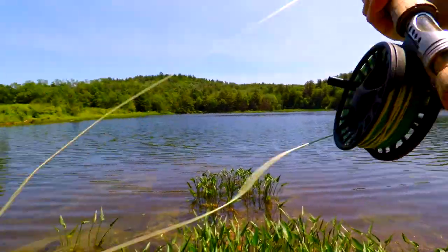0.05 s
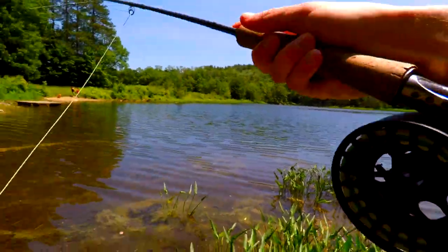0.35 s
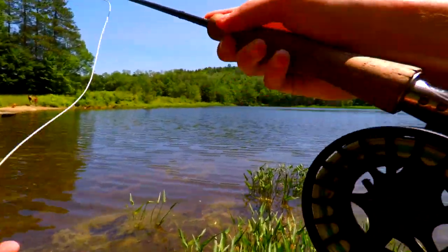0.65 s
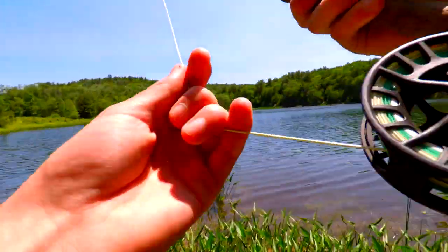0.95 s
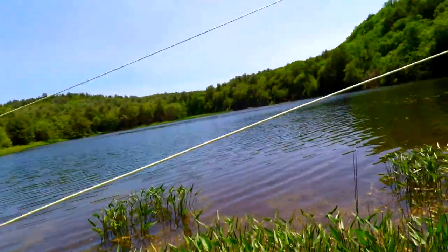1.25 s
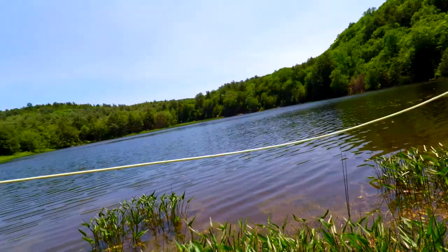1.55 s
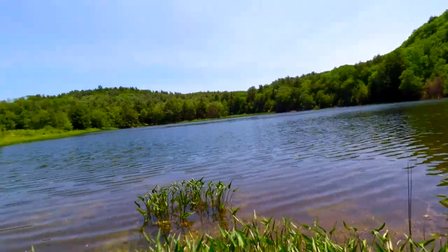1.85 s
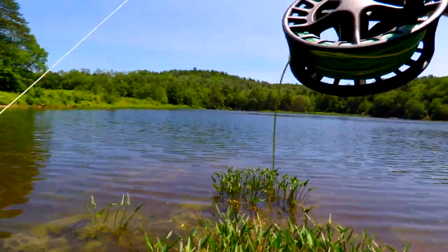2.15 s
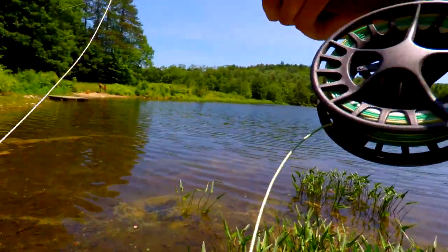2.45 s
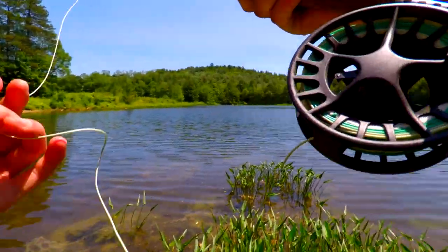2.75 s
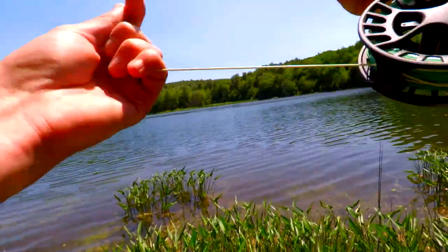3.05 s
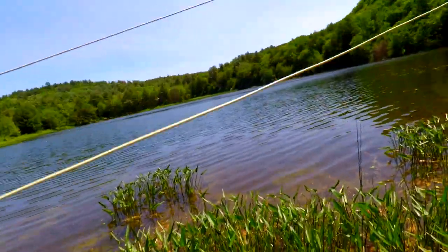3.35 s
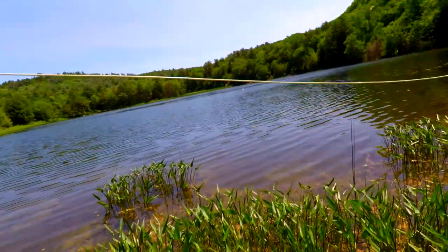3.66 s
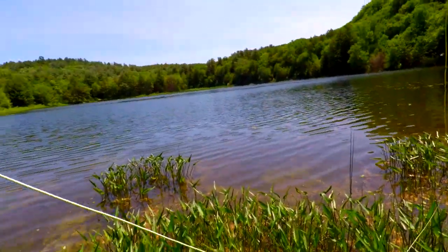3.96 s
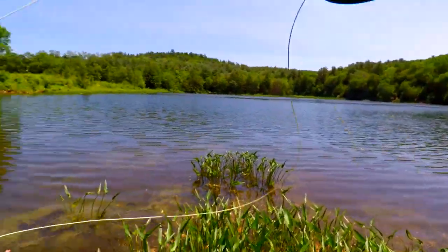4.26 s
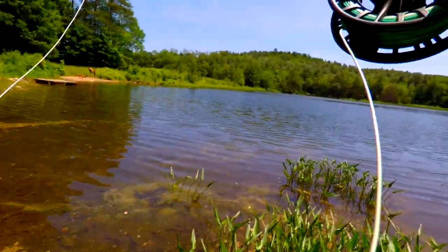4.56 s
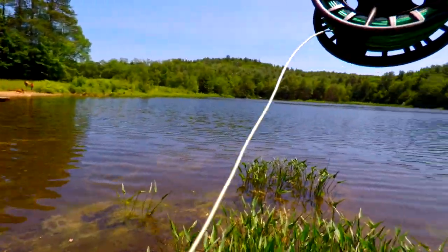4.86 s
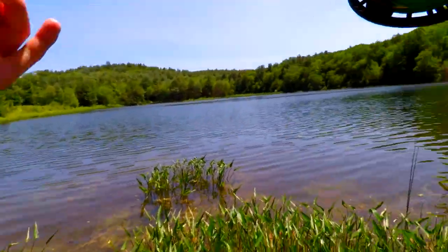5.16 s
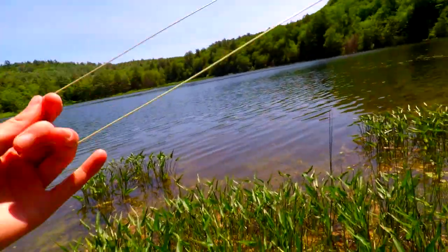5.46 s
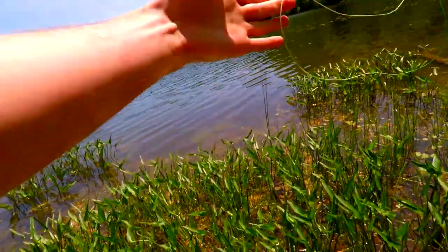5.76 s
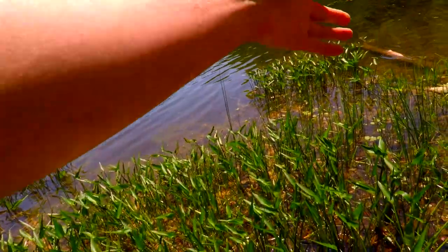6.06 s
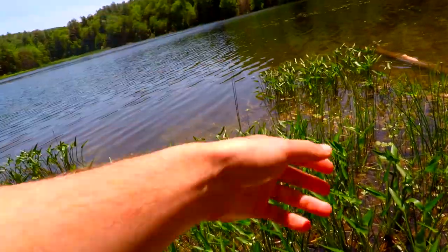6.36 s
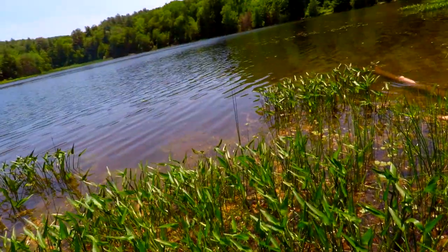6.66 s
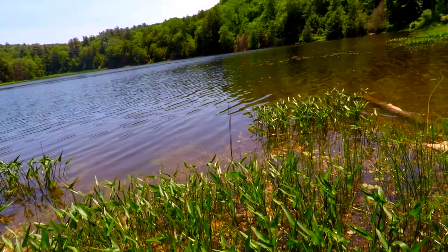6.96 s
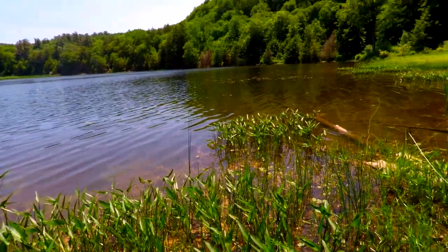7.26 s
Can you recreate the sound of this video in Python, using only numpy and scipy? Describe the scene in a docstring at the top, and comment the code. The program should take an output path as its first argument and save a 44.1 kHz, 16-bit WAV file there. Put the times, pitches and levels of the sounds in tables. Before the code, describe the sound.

A short run of sharp reel clicks opens a spell of fly casting, heard close on a body-worn microphone. Two faster ratcheting zips follow a couple of seconds apart, then a last, slower one. In between come a soft, grainy hiss of sliding line, small dry snaps and dull thumps as each stroke turns. A faint lakeside breeze and an even rustle of leaves continue behind it all.

```python
"""A quiet lake shore, fly casting heard close up on the microphone of a body-worn camera.
Four pulls strip line off the reel, whose pawl clicks speed up into a zip and slow down again.
Between pulls the line hisses through the rod guides and ticks against rod and fingers. Each turn of
the casting stroke jolts the microphone with a low thump. Behind it all, a light breeze and leaves."""
import sys
import numpy as np
from scipy import signal
from scipy.fft import rfft, irfft
from scipy.io import wavfile
from scipy.ndimage import map_coordinates

SR = 44100
rng = np.random.default_rng(int(sys.argv[2]) if len(sys.argv) > 2 else 0)


def to_wav(sig):
    """Store sig (one row per channel, or 1-D mono) as 16-bit WAV at the path in sys.argv[1].

    Samples outside -1..1 are clipped; the rate is SR.
    """
    pcm = np.clip(np.atleast_2d(sig), -1, 1) * 32767
    pcm = np.round(pcm).astype(np.int16)
    wavfile.write(sys.argv[1], SR, pcm.T)  # frames by channels


N = 321792

# runs of line through the guides: start/s, end/s, final relative level/dB, state of the line
LINE_RUNS = [(0.43, 0.734, -71, "light"), (2.204, 2.852, -73.5, "taut"), (4.398, 5.14, -73.5, "taut"),
             (5.276, 5.428, -71, "taut"), (5.668, 5.849, -77, "slack")]


def reel_pawl(tail_db=-8, tail_t60=0.058, scatter_db=1.83, jitter_s=6e-6, size=2048):
    """The pawl drops off tooth after tooth; each rings the same reel, so a fast spin has a pitch."""
    # spool speed, one list for each pull: t/s, rate/(teeth/s)
    pulls = [
        [(.1136, 72), (.138, 132), (.16, 155), (.19, 178), (.207, 175), (.234, 119), (.2607, 64)],
        [(.9666, 25), (.994, 88), (1.03, 225), (1.07, 345), (1.11, 520), (1.15, 775), (1.167, 850),
         (1.185, 878), (1.21, 832), (1.29, 385), (1.325, 175), (1.3522, 58)],
        [(3.0653, 135), (3.125, 340), (3.145, 430), (3.183, 690), (3.205, 785), (3.225, 905), (3.24, 934),
         (3.255, 930), (3.285, 785), (3.315, 580), (3.365, 300), (3.414, 68)],
        [(5.2936, 92), (5.315, 205), (5.36, 285), (5.385, 295), (5.432, 205), (5.4626, 82)],
    ]
    # the reel's answer along the pulls: t/s, spool resonance/Hz, body level/dB, treble level/dB
    reel_response = [(.11, 4350, -34.5, -33), (.16, 4550, -38, -31.5), (.19, 4450, -40.5, -34),
                     (.215, 4460, -36, -31.5), (.26, 4230, -32.5, -33.5), (.97, 4300, -39, -37),
                     (1.04, 4360, -37.5, -35.5), (1.08, 4400, -38, -38), (1.115, 4830, -36.5, -40),
                     (1.15, 4830, -36.5, -36.5), (1.185, 5140, -39.5, -39), (1.21, 5040, -39, -38),
                     (1.265, 5650, -40.5, -41), (1.3, 4160, -43, -40), (1.35, 4200, -39, -44),
                     (3.07, 4500, -35.5, -37.5), (3.12, 4900, -35, -37), (3.15, 3860, -39, -37.5),
                     (3.2, 4170, -37, -37), (3.245, 3800, -36, -42), (3.28, 3900, -42.5, -40.5),
                     (3.315, 4850, -40.5, -42), (3.342, 4600, -48, -41.5), (3.364, 4600, -40.5, -38.5),
                     (3.41, 4470, -47, -44), (5.29, 4700, -39, -40), (5.31, 4730, -45, -37),
                     (5.34, 4750, -42.5, -40), (5.372, 4570, -44, -41), (5.4, 4750, -40, -37.5),
                     (5.44, 4800, -45, -42), (5.46, 4380, -42, -43)]
    out, t, hz = np.zeros(N), np.arange(size) / SR, np.fft.rfftfreq(size, 1 / SR)
    scrape_decay = (1 - np.exp(-t / .0005)) * amp(-60 * t / .0045)
    treble = np.interp(hz, [8000, 10000], [0, 1])
    response_s, *columns = np.transpose(reel_response)
    for pull in pulls:
        knots, rates = np.transpose(pull)
        clock = np.arange(knots[0], knots[-1], 1 / SR)
        teeth = np.cumsum(np.interp(clock, knots, rates)) / SR
        times = np.interp(np.linspace(0, teeth[-1], round(teeth[-1]) + 1), teeth, clock)
        ring_hz, body_db, treble_db = (np.interp(times, response_s, c)[:, None] for c in columns)
        tooth_rate = np.interp(times, knots, rates)
        spin = np.interp(tooth_rate, [340, 560], [0, 1])[:, None]  # 0 slow clicks, 1 fast zip
        # the teeth of a pull share one snap and one tail of fine resonances; each adds its own scrape
        snap = pawl_snap(hz)
        tail = amp(tail_db) * unit_power(rfft(rng.standard_normal(size) * amp(-60 * t / tail_t60)))
        scrape = unit_power(rfft(rng.standard_normal((len(times), size)) * scrape_decay))
        roughness = .6 * (1 - spin) + .38 * spin
        contact = snap + tail * (1 + spin) / 2 + scrape * roughness
        struck = contact * reel_ring(times, hz, ring_hz, spin)
        clicks = amp(body_db) * unit_power(struck * (1 - treble))
        clicks += amp(treble_db) * unit_power(struck * treble)
        times = times + jitter_s * rng.standard_normal(len(times))
        subsample_delay = np.exp(-2j * np.pi * hz / SR * (times * SR % 1)[:, None])
        for s, click in zip(times, irfft(clicks * subsample_delay)):
            add(out, s, amp(scatter_db * rng.standard_normal()) * click)
    return out


def pawl_snap(hz, spread_s=0.0014, bands=36):
    """Flat spectrum of a snap whose bands each arrive a little late, by up to spread_s."""
    delay = spread_s * np.interp(hz, np.linspace(0, SR / 2, bands), rng.uniform(.1, 1, bands))
    return np.exp(-2j * np.pi * np.cumsum(delay) * hz[1])


def reel_ring(times, hz, ring_hz, spin, half_width_hz=510, patch_s=.022, patch_hz=800):
    """The reel's response to each tooth; at speed the pawl skims and the ring spreads out."""
    # the reel's spectrum under single clicks and in a fast spin: f/Hz, level/dB
    slow_spectrum = [(400, -30.5), (1500, -11), (2150, -5.5), (2600, -11.5), (3100, -7), (3550, -11.5),
                     (4400, -13.5), (5400, -12.5), (6000, -8.5), (7700, -10), (8600, -13), (9600, -11.5),
                     (10300, -1), (10900, -16), (11500, 4), (12200, -17.5), (12800, 7.5), (13300, 0.5),
                     (15000, -1), (16000, -16)]
    fast_spectrum = [(400, -32), (950, -10), (1800, -6.5), (2450, -8.5), (3000, -1.5), (3550, 3),
                     (4250, -3), (4900, 2), (5500, 0.5), (6000, 1), (6500, 1), (7800, -8), (9300, -12),
                     (10400, 2.5), (11500, -1), (13900, 4.5), (14600, 0), (15200, -15), (16000, -41)]
    resonance = 1 / (1 + ((hz - ring_hz) / half_width_hz) ** 6)
    slow_db = spectrum_db(slow_spectrum, hz) + 14 * resonance
    fast_db = spectrum_db(fast_spectrum, hz) + 3.5 * resonance
    # as the spool turns, its ring shifts in random patches of time and frequency
    rows, columns = (times - times[0]) / patch_s, hz / patch_hz
    field = rng.standard_normal((int(rows[-1]) + 2, int(columns[-1]) + 2))
    patches = map_coordinates(field, np.meshgrid(rows, columns, indexing="ij"))
    patch_db = 3.2 * patches * (1 + spin) / 2
    return minimum_phase((1 - spin) * slow_db + spin * fast_db + patch_db)


def line_hiss(gain_db=4, attack_s=0.074, release_s=0.031, rise_db=2, flutter_db=1.5, grain_db=2.2):
    """The line's coating rubs over the guides: a grainy hiss that grows until the run is checked."""
    # hiss of lightly cast, taut and slack line: f/Hz, level/dB
    light_spectrum = [(500, -10), (2000, -9), (3500, -7.5), (5800, -6.5), (6700, 0), (7200, -4.5),
                      (7800, -0.5), (9000, -19), (10000, -13), (11500, -21), (14000, -15), (15500, -43)]
    taut_spectrum = [(500, -4), (2300, -3), (2950, -7.5), (3450, 0.5), (3950, -4), (4650, 1.5),
                     (5400, -4.5), (6100, -6), (6900, -7.5), (7900, -5.5), (9000, -15), (12500, -21),
                     (14000, -20), (15000, -20), (15500, -30)]
    slack_spectrum = [(600, 3.5), (1700, 6.5), (3500, 3), (7500, 0.5), (9500, -8), (14000, -1),
                      (15500, -20)]
    # brushes over the fingers: t/s, half length/s, relative level/dB, state of the line
    brushes = [(0.504, 0.031, -79, "slack"), (0.822, 0.021, -76, "light"), (1.127, 0.13, -74.5, "slack"),
               (2.872, 0.02, -63.5, "taut"), (3.228, .08, -71.5, "slack"), (3.115, 0.012, -62.5, "taut"),
               (5.333, 0.014, -67, "taut"), (6.027, 0.02, -71, "slack")]
    out, t = np.zeros(N), np.arange(N) / SR
    spectra = {"light": light_spectrum, "taut": taut_spectrum, "slack": slack_spectrum}
    level = {state: np.zeros(N) for state in spectra}
    for start, end, db, state in LINE_RUNS:
        edges = np.exp(np.minimum(t - start, 0) / attack_s - np.maximum(t - end, 0) / release_s)
        level[state] += edges * amp(db + np.interp(t, [start, end], [-rise_db, 0]))
    for s, half_length, db, state in brushes:
        level[state] += amp(db) * swell(s, half_length)
    for state, spectrum in spectra.items():
        hiss = noise(spectrum) * amp(flutter_db * wobble(40) + grain_db * wobble(900))
        out += level[state] * unit_rms(hiss)
    return amp(gain_db) * out


def line_singing():
    """Late in a run the fast line sings in the guides with a narrow, high hiss."""
    # swells of the singing: t/s, half length/s, level/dB
    swells = [(2.76, 0.16, -75), (4.98, 0.16, -81)]
    # its band near 8 kHz: f/Hz, level/dB
    spectrum = [(5000, -56), (7100, -21), (7700, 0), (8200, 1), (8800, -22), (12500, -20), (14200, -12),
                (15500, -36)]
    return sum(amp(db) * swell(s, half_length) for s, half_length, db in swells) * noise(spectrum)


def line_ticks(gain_db=-6, t60=.013, strays_per_run=3, size=2048):
    """The line touches rod, reel and fingers, each time with a short, dry snap."""
    # touches: t/s, relative level/dB, centre/Hz, fall one octave off the centre/dB
    touches = [(.073, -55, 7000, 7), (.1394, -53, 3970, 0.5), (.681, -47.5, 3500, 5.5),
               (.688, -46.5, 3480, 7.5), (.711, -58, 4970, 2), (.72, -46, 4000, 5), (.728, -48.5, 5000, 9),
               (.766, -44.5, 9000, 0), (.771, -46.5, 2000, 3), (.776, -60, 3000, 6), (.785, -55, 4000, 10),
               (.817, -55, 4470, 11), (.827, -53, 5000, 15), (.834, -63, 5500, 10), (.852, -57, 5070, 14),
               (.952, -51, 5500, 3), (1.104, -38, 8000, 8), (2.395, -46.5, 1470, 4.5),
               (2.8537, -30, 9830, 1.5), (2.873, -50, 7000, 0), (3.2237, -33, 4200, -0.5),
               (3.476, -52.5, 1790, 8), (3.996, -51.5, 2470, 8), (4.458, -50, 2950, 12),
               (5.117, -42.5, 7840, 5), (5.185, -42.5, 10000, -1), (5.3177, -38, 5400, 14),
               (5.33, -49, 5300, 5), (6.09, -51, 4000, 6)]
    strays = [(rng.uniform(start, end), -58 - 3 * rng.standard_normal(), 10000, 5)
              for start, end, *_ in LINE_RUNS for touch in range(strays_per_run)]
    out, t, hz = np.zeros(N), np.arange(size) / SR, np.fft.rfftfreq(size, 1 / SR)
    decay = (1 - np.exp(-t / .0003)) * amp(-60 * t / t60)
    for s, db, centre_hz, skirt_db in touches + strays:
        hump_db = -skirt_db * np.log2((hz + 100) / centre_hz) ** 2
        snap = rfft(rng.standard_normal(size) * decay)
        add(out, s, amp(db + gain_db) * irfft(snap * minimum_phase(hump_db)))
    return out


def frame_pings(t60=.06):
    """Light knocks ring the reel's metal frame briefly on one mode."""
    # knocks: t/s, level/dB, f/Hz
    knocks = [(.016, -65, 4980), (.036, -61, 4980), (2.875, -57, 4980), (2.893, -61, 4980),
              (5.318, -51, 5750)]
    out, t = np.zeros(N), np.arange(SR // 8) / SR
    decay = (1 - np.exp(-t / .001)) * amp(-60 * t / t60)
    for s, db, hz in knocks:
        add(out, s, amp(db) * decay * np.sin(2 * np.pi * hz * t))
    return out


def microphone_thumps(leak_s=0.074):
    """A jolt is a soft pressure step that leaks away; the body's sway adds a drift below hearing."""
    # jolts at the turns of the stroke: t/s, signed strength, rise/s, cushioning low-pass/Hz
    jolts = [(1.006, 0.18, 0.014, 45), (1.19, -0.23, 0.018, 44.8), (1.705, 0.22, 0.014, 45),
             (2.033, -0.82, 0.18, 40), (2.89, 0.13, 0.019, 70), (3.156, -0.25, 0.014, 71),
             (3.715, 0.33, 0.035, 30), (4.151, -0.58, 0.15, 60), (5.212, 0.18, 0.014, 69),
             (5.382, -0.23, 0.014, 64.5), (5.676, 0.19, 0.063, 30), (6.692, 0.44, 0.17, 30)]
    # drift as the body moves: t/s, level/dB
    sway = [(0, -30), (5.6, -35), (6.0, -44), (7.3, -38.5)]
    out, t = np.zeros(N), np.arange(SR) / SR
    for s, strength, rise_s, cushion_hz in jolts:
        jolt = np.zeros(N)
        add(jolt, s, strength * (1 - np.exp(-t / rise_s)) * np.exp(-t / leak_s))
        out += signal.sosfiltfilt(signal.butter(1, cushion_hz, fs=SR, output="sos"), jolt)
    sway_db = np.interp(np.arange(N) / SR, *np.transpose(sway))
    return out + amp(sway_db) * wobble(6)


def thin_tone(pitch_hz=935, waver_hz=10):
    """A faint, wavering tone sounds twice during the second cast."""
    # swells of the tone: t/s, half length/s, level/dB
    swells = [(2.195, 0.033, -68.5), (2.356, 0.011, -68)]
    level = sum(amp(db) * swell(s, half_length) for s, half_length, db in swells)
    hz = pitch_hz + waver_hz * wobble(31.1)
    return level * np.sin(2 * np.pi * np.cumsum(hz) / SR)


def shore_breeze(rush_db=-62.5, air_db=-71, leaves_db=-76):
    """A light breeze over the lake, with one soft gust, and a faint, even rustle of leaves."""
    # low rush of wind, open air and leaves: f/Hz, level/dB
    rush_spectrum = [(20, 16), (50, 9.5), (90, 4), (160, -2), (300, -3), (450, -8), (800, -14), (2000, -44)]
    air_spectrum = [(100, -14.5), (300, -2.5), (520, -1), (900, -3.5), (1400, -5), (2200, -12),
                    (3500, -17.5), (6000, -22.5), (12000, -36)]
    leaf_spectrum = [(1000, 5.5), (2500, 3), (4500, -1.5), (7000, -4), (12000, -5.5), (15000, -16)]
    gust_db = 4 * swell(s=4.53, half_length=0.56)
    rush = amp(rush_db + gust_db + .5 * wobble(6)) * noise(rush_spectrum)
    air = amp(air_db + 0.48 * gust_db + .5 * wobble(6)) * noise(air_spectrum)
    leaves = amp(leaves_db + .5 * wobble(6)) * noise(leaf_spectrum)
    return rush + air + leaves


def amp(db):
    return 10 ** (np.asarray(db) / 20)


def unit_rms(x):
    return x / np.sqrt(np.mean(x ** 2) + 1e-20)


def unit_power(gain):
    """Each row of gains brought to a mean power of 1."""
    return gain / np.sqrt(np.mean(abs(gain) ** 2, -1, keepdims=True))


def spectrum_db(points, hz):
    """Join (f/Hz, level/dB) points on a log frequency axis."""
    f, db = np.transpose(points)
    return np.interp(np.log(hz + 1), np.log(f + 1), db)


def minimum_phase(gain_db):
    """Causal response of unit power with the given spectral shape, one for each row."""
    cepstrum = irfft(np.log(unit_power(amp(gain_db)) + 1e-6))
    half = cepstrum.shape[-1] // 2
    cepstrum[..., 1:half] *= 2
    cepstrum[..., half + 1:] = 0
    return np.exp(rfft(cepstrum))


def noise(spectrum):
    """Coloured noise of rms 1."""
    gain = amp(spectrum_db(spectrum, np.fft.rfftfreq(N, 1 / SR)))
    return unit_rms(irfft(rfft(rng.standard_normal(N)) * gain, N))


def wobble(rate):
    """A smooth random curve, rate knots a second."""
    return map_coordinates(rng.standard_normal(int(N * rate / SR) + 4), [np.arange(N) * rate / SR])


def swell(s, half_length):
    """A bell-shaped rise and fall around s seconds."""
    return np.exp(-((np.arange(N) / SR - s) / half_length) ** 2)


def add(track, s, sound):
    """Mix a sound into the track at s seconds."""
    part = track[max(int(s * SR), 0):][:len(sound)]
    part += sound[:len(part)]


def scene():
    """Reel and line at arm's length, the shore behind them, in mono."""
    tackle = reel_pawl() + line_hiss() + line_singing() + line_ticks() + frame_pings()
    return (tackle + microphone_thumps() + thin_tone() + shore_breeze())[None]


def record(dry, top_hz=15800):
    """The body-worn camera keeps nothing above its band limit."""
    return signal.sosfiltfilt(signal.butter(24, top_hz, fs=SR, output="sos"), dry)


dry = scene()
out = record(dry)
to_wav(out)
```